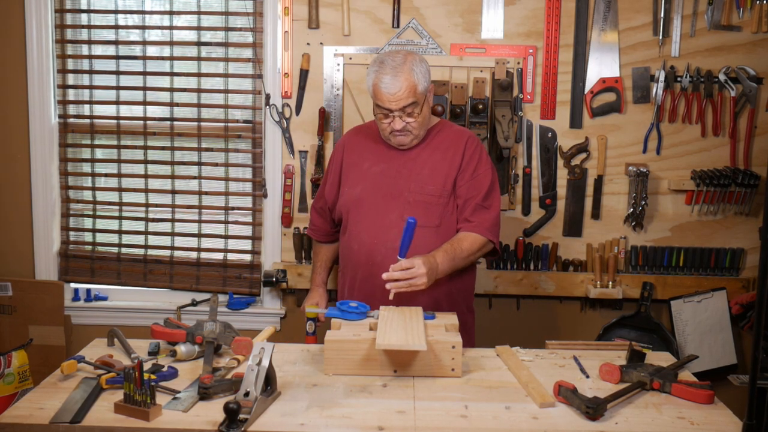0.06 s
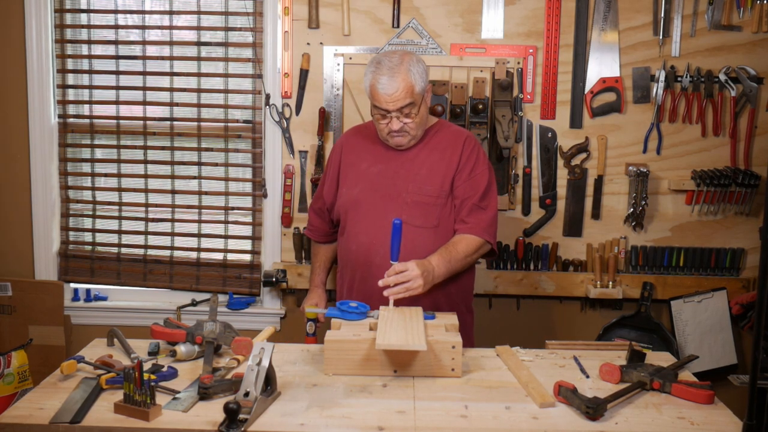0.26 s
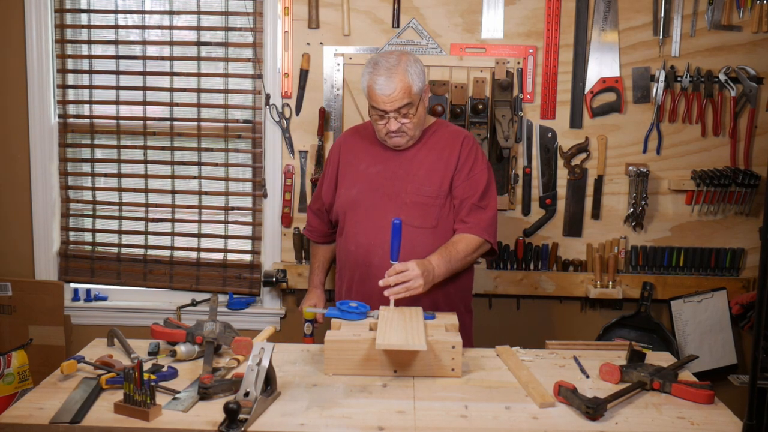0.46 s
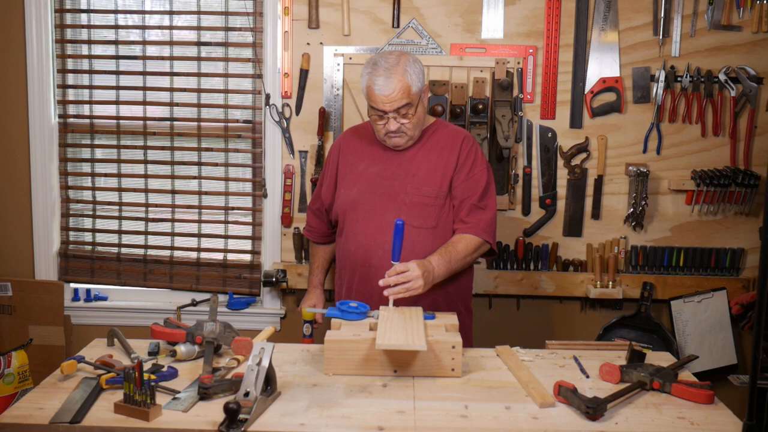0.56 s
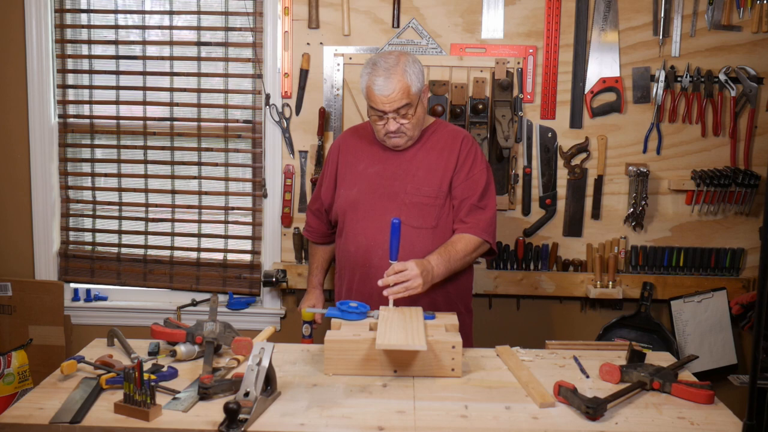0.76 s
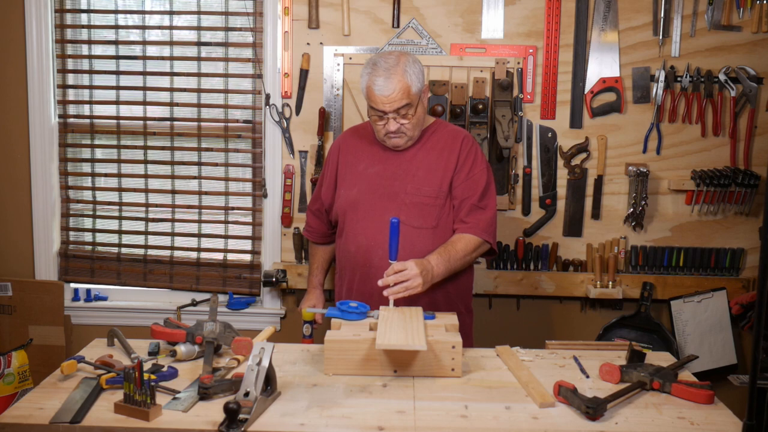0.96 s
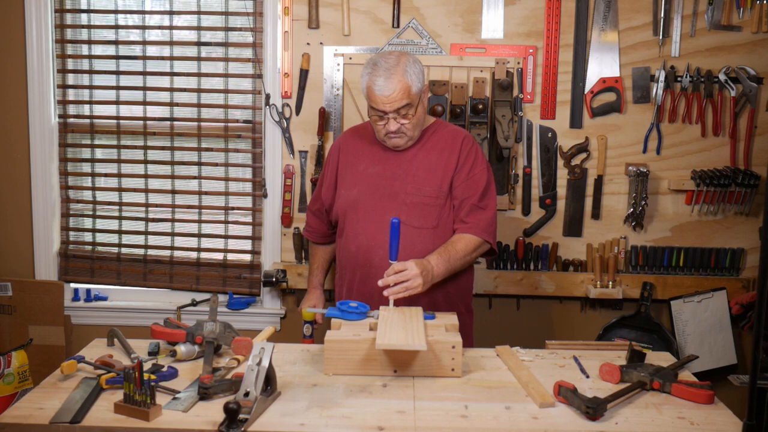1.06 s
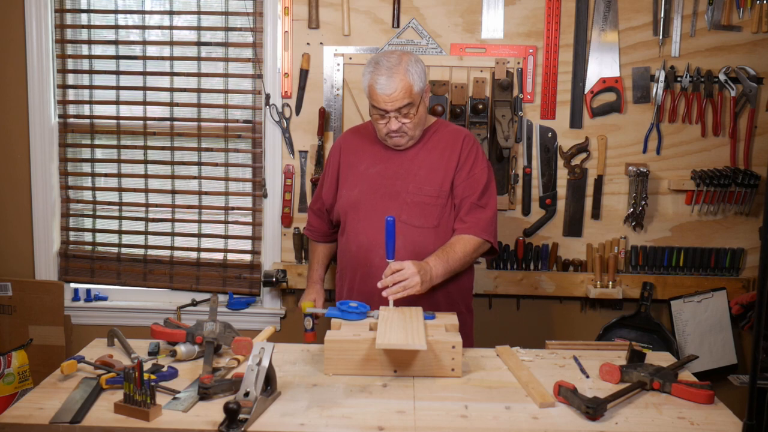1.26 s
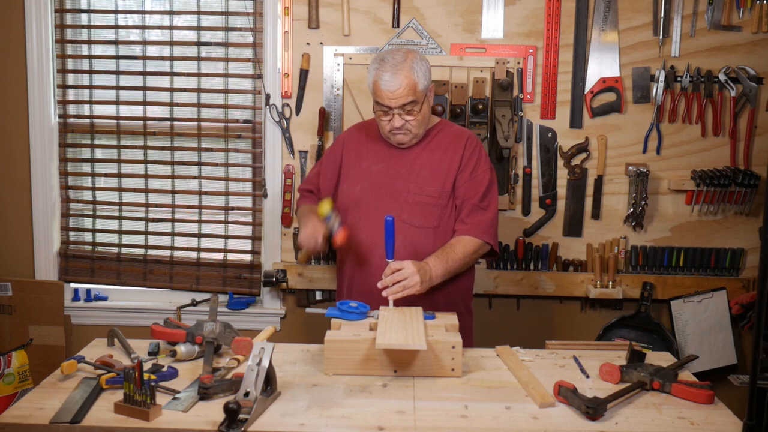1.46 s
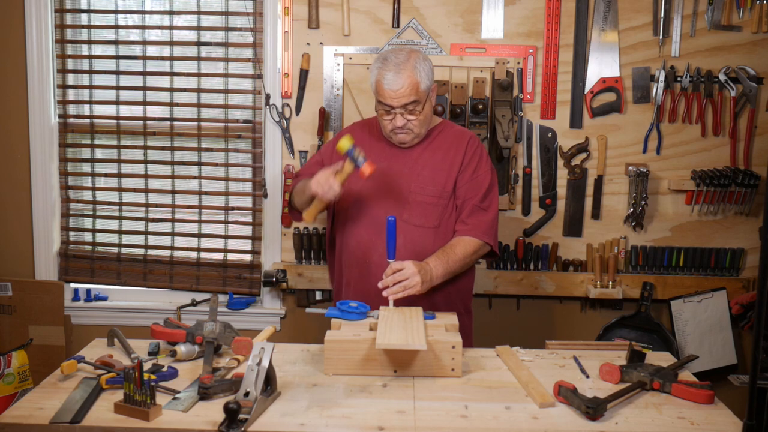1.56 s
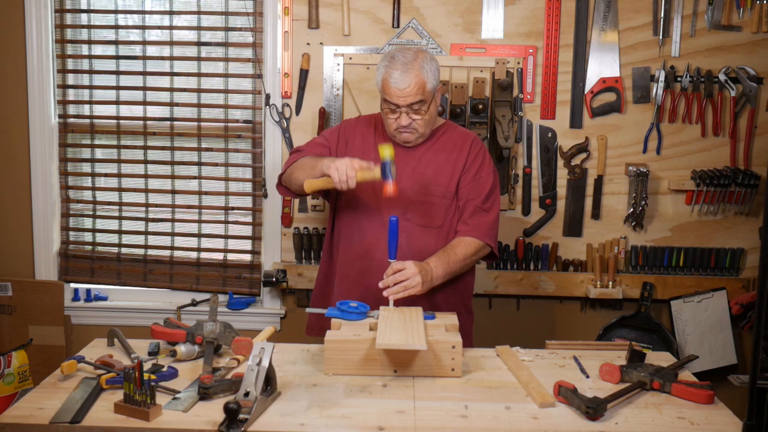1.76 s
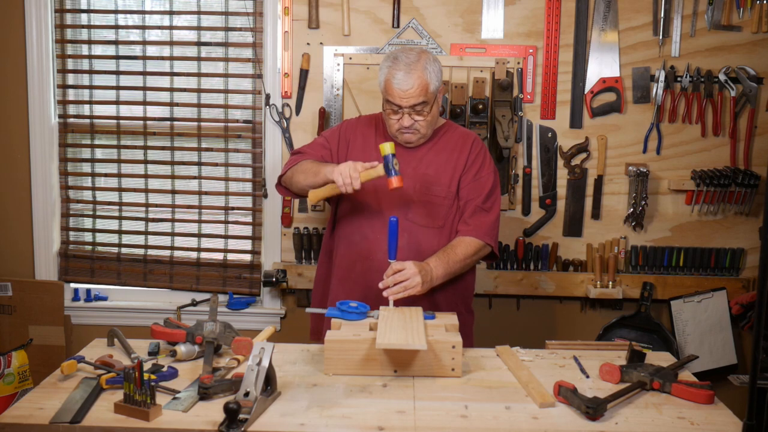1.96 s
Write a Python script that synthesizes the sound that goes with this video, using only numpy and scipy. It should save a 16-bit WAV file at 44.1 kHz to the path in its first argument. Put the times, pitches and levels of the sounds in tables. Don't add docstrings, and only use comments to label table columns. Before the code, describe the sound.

A chisel is set on a board with faint taps, crunches and small clicks over quiet hiss, then one hard mallet blow cracks loudly and distorts; close, nearly mono microphone in a small wooden workshop.

```python
import sys
import numpy as np
from scipy import signal
from scipy.fft import rfft, irfft
from scipy.io import wavfile

SR = 44100
rng = np.random.default_rng(int(sys.argv[2]) if len(sys.argv) > 2 else 0)


def put_to_file(sound):
    columns = np.atleast_2d(sound).T
    safe = np.clip(columns, -1, 1)
    whole_steps = np.round(safe * 32767)
    wavfile.write(sys.argv[1], SR, whole_steps.astype(np.int16))


def ratio(d):
    e = np.asarray(d, float) / 20
    return 10 ** e


N = 88200
T = np.arange(N) / SR
BLOW_S = 1.9428
THUD_S = BLOW_S + 0.003016
SPREAD_DB = 1.5


def rms_one(x):
    return x / np.sqrt(np.mean(x ** 2) + 1e-20)


def at_hz(points, hz):
    table_hz, values = np.array(points).T
    return np.interp(np.log(hz), np.log(table_hz), values)


def coloured(spectrum):
    hz = np.arange(N // 2 + 1) * SR / N + 1e-3
    gain = (hz > 0.8 * spectrum[0][0]) * ratio(at_hz(spectrum, hz))
    return rms_one(irfft(rfft(rng.standard_normal(N)) * gain, N))


def lowpass(x, hz):
    return signal.sosfilt(signal.butter(2, min(hz, 0.45 * SR), fs=SR, output="sos"), x)


def bandpass(x, low_hz, high_hz):
    return signal.sosfilt(signal.butter(2, [low_hz, high_hz], "band", fs=SR, output="sos"), x)


def ring(times, levels_db, modes, spread_db):
    out = np.zeros(N)
    luck = rng.standard_normal((len(times), len(modes)))
    starts = (np.array(times) * SR).astype(int)
    for k, (hz, db, t60) in enumerate(modes):
        clicks = np.full(N, 1e-18)
        np.add.at(clicks, starts, ratio(np.array(levels_db) + db + spread_db * luck[:, k]))
        r = ratio(-60 / (t60 * SR))
        w = 2 * np.pi * hz / SR
        out += signal.lfilter([0, np.sin(w)], [1, -2 * r * np.cos(w), r * r], clicks)
    return out


# [f/Hz, level/dB]
HUM_TONES = [(58.5, -102), (119, -81), (177, -70.5)]


def hum():
    return sum(ratio(db) * np.sin(2 * np.pi * hz * T) for hz, db in HUM_TONES)


# [f/Hz, level/dB per Hz]
HISS_COLOUR = [(15, -40), (25, -15), (59, -2), (183, -9.5), (215, -8.5), (648, -11.5), (782, -15.5),
               (919, -16), (15500, -22.5)]


def hiss():
    return ratio(-53.5) * coloured(HISS_COLOUR)


# [f/Hz, level/dB per Hz]
SIDE_COLOUR = [(18, -41), (30, -6), (1380, -8), (1610, -11.5), (2270, -9.5), (4370, -8.5), (15800, -11)]


def side_noise(burst_shape):
    floor_db, crack_db = -67.5, -23.5
    return (ratio(floor_db) + ratio(crack_db) * burst_shape) * coloured(SIDE_COLOUR)


# [f/Hz, level/dB, t60/s]
EARLIER_MODES = [(30.7, -52, 1.6), (180, -57, 0.77), (126.5, -66, 1.1), (238, -49.5, 0.26),
                 (383, -39.5, 0.46), (500, -49.5, 0.17), (700, -50.5, 0.44), (760, -58, 0.6),
                 (1020, -62.5, 0.82), (1523, -65, 1.5)]


def earlier_knock():
    level_db, t60_s, cut_hz = -48.5, 0.4, 5600
    noise = rms_one(lowpass(rng.standard_normal(N), cut_hz))
    wash = ratio(level_db - 60 * T / t60_s) * noise
    return wash + ring([0], [0], EARLIER_MODES, 0)


# [t/s, board level/dB, edge level/dB, grit level/dB, grit t60/s]
TAPS = [(0.368, -28, -36.5, -41, 0.041), (0.397, -32.5, -48, -54, 0.042), (0.468, -74, -62, -52, .015),
        (0.7199, -35.5, -47, -41, 0.019), (0.732, -42.5, -52, -48.5, 0.18), (0.746, -37, -56, -67, 0.07),
        (0.8839, -55, -62, -48.5, 0.031), (0.937, -49, -46.5, -45.5, 0.075), (1.001, -57, -49, -52, 0.15),
        (1.030, -43.5, -47, -53.5, 0.048), (1.06, -49, -60, -69, 0.041), (1.2549, -45, -46.5, -47.5, 0.071),
        (1.265, -64, -46.5, -54, 0.076), (1.276, -51, -55, -47, 0.031), (1.284, -47, -43, -44, 0.05),
        (1.292, -46, -39, -42.5, 0.066), (1.298, -40, -56, -67, 0.17), (1.328, -48, -51, -60, 0.043)]
# [f/Hz, level/dB, t60/s]
BOARD_MODES = [(285, -21, 0.048), (375, -12.5, 0.12), (436, -3.5, 0.044), (474, 1.5, .13),
               (538, -16.5, 0.05), (626, -15.5, 0.072)]
# [f/Hz, level/dB, t60/s]
BLADE_MODES = [(709.5, 6.5, 0.1), (759, 7.5, 0.043), (1854, -1, 0.067), (1960, -22, 0.028),
               (4400, -23, 0.0095)]
# [f/Hz, level/dB per Hz]
GRIT_COLOUR = [(1000, -11), (1700, 1.5), (1990, 4), (2310, -3), (3950, 6), (4840, 0.5), (5280, 1),
               (6830, -7), (11000, -13), (14300, -53), (22000, -120)]


def taps():
    start_s, board_db, edge_db, grit_db, grit_t60 = np.transpose(TAPS)
    t = T - start_s[:, None]
    decay_db = 60 * np.maximum(t, 0) / np.maximum(grit_t60, 0.005)[:, None]
    crunch = np.sum((t > 0) * ratio(grit_db[:, None] - decay_db), axis=0)
    board = bandpass(ring(start_s, board_db, BOARD_MODES, SPREAD_DB), 298, 730)
    blade = ring(start_s, edge_db - 8, BLADE_MODES, SPREAD_DB)
    return crunch * coloured(GRIT_COLOUR) - board - blade


# [t/s, top level/dB, legs level/dB]
LEANS = [(0.382, -44.5, -70), (.40, -43, -43), (.525, -49.5, -50.5), (.575, -49, -54), (0.731, -39, -55),
         (0.749, -39.5, -42.5), (0.849, -55.5, -52.5), (0.952, -48, -54), (1.044, -52.5, -47),
         (1.31, -57, -45), (1.33, -43, -46)]
# [f/Hz, level/dB, t60/s]
BENCH_TOP_MODES = [(131, -7, 0.24), (174.7, 6, 0.25), (242, -6, 0.17)]
# [f/Hz, level/dB, t60/s]
BENCH_LEG_MODES = [(55, -27, 0.17), (73.2, 0, 0.26), (103.8, -7, 0.41)]


def bench():
    push_s, from_hz = 0.0044, 30
    lean_s, top_db, legs_db = np.transpose(LEANS)
    top = ring(lean_s, top_db, BENCH_TOP_MODES, SPREAD_DB)
    legs = ring(lean_s, legs_db, BENCH_LEG_MODES, SPREAD_DB)
    push = np.hanning(int(push_s * SR) + 3)
    pushed = np.convolve(top + legs, push / push.sum())[:N]
    return pushed - lowpass(pushed, from_hz)


# [f/Hz, t60/s]
SHOP_T60 = [(100, 0.44), (500, 0.41), (2000, 0.44), (5000, 0.22), (9000, 0.16), (15000, 0.04)]


def shop(x):
    gap_s, build_s = 0.013, 0.0044
    t = T[:SR // 2]
    tail = 0
    edges = 60 * 2 ** np.arange(0, 8.1, 0.5)
    white = rng.standard_normal((2, len(t)))
    for k, (low, high) in enumerate(zip(edges, edges[1:])):
        t60_s = at_hz(SHOP_T60, np.sqrt(low * high))
        tail = tail + bandpass(white[k % 2], low, high) * ratio(-60 * t / t60_s)
    tail = tail * (1 - np.exp(-np.maximum(t - gap_s, 0) / build_s))
    return signal.fftconvolve(x, tail / np.sqrt(np.sum(tail ** 2)))[:N]


# [f/Hz, level/dB per Hz]
CLICK_COLOUR = [(760, -61), (1300, -29), (1790, -3), (2580, 2), (3550, -5.5), (6350, -0.5), (10800, -15),
                (11800, -8.5), (15500, -25)]


def click():
    start_s, level_db, rise_s, t60_s = 0.4852, -34, 0.0038, 0.3
    t = np.maximum(T - start_s, 0)
    return ratio(level_db - 60 * t / t60_s) * (1 - np.exp(-t / rise_s)) * coloured(CLICK_COLOUR)


def blow():
    peak_s, width_s = 0.002077, 0.0011
    from_hz, to_hz = 2200, 4668
    squeal_db, crack_db = 5.5, 0.5
    t = T - BLOW_S
    contact = np.exp(-0.5 * ((t - peak_s) / (0.67 * width_s)) ** 2) * (t > 0)
    hz = from_hz + (to_hz - from_hz) * np.clip(t / (0.923 * peak_s), 0, 1)
    squeal = ratio(squeal_db) * np.sin(2 * np.pi * np.cumsum(hz * (t > 0)) / SR + 1.4)
    noise = lowpass(rng.standard_normal(N), 6800)
    crack = ratio(crack_db) * rms_one(noise - lowpass(noise, 1900))
    return contact * (squeal + crack), contact


# [f/Hz, level/dB, t60/s]
STRUCK_MODES = [(68.3, -41, .4), (134, -34, 0.49), (190, -28, 0.087), (244, -28, 0.034), (350, -34, 0.15),
                (482.6, -22, 0.75), (535.6, -11, 0.11), (565, -20.5, 0.27), (660, -5.5, 0.016),
                (1030, -23, 0.026), (1605, -22.5, 0.071), (2000, -30, 0.1), (2460, -8.5, 0.018),
                (2700, -14.5, 0.027)]


def struck_wood():
    return ring([THUD_S], [0], STRUCK_MODES, 0)


# [f/Hz, level/dB per Hz]
CLATTER_COLOUR = [(440, -39), (750, -11), (1050, -2.5), (1400, -12), (1550, -1.5), (2940, -3.5), (4850, -1),
                  (8320, -16), (15000, -42)]


def clatter():
    level_db, rise_s, t60_s = -22.5, 0.00093, 0.73
    t = np.maximum(T - THUD_S, 0)
    return ratio(level_db - 60 * t / t60_s) * (1 - np.exp(-t / rise_s)) * coloured(CLATTER_COLOUR)


def scene():
    touch = taps()
    crack, burst_shape = blow()
    struck = struck_wood()
    tail = shop(ratio(-14) * touch + ratio(-14) * struck)
    background = hum() + hiss() + earlier_knock()
    mid = background + touch + bench() + click() + crack + struck + clatter() + tail
    side = side_noise(burst_shape)
    return np.array([mid + side, mid - side])


def band_limit(x):
    return signal.sosfilt(signal.butter(12, 16160, fs=SR, output="sos"), x)


def record(dry):
    clip = 0.97
    squashed = dry / (1 + (dry / clip) ** 6) ** (1 / 6)
    return band_limit(squashed)


dry = scene()
out = record(dry)
put_to_file(out)
```